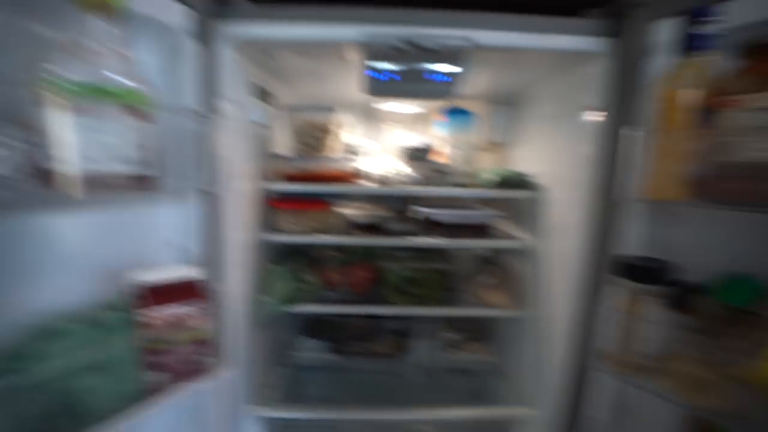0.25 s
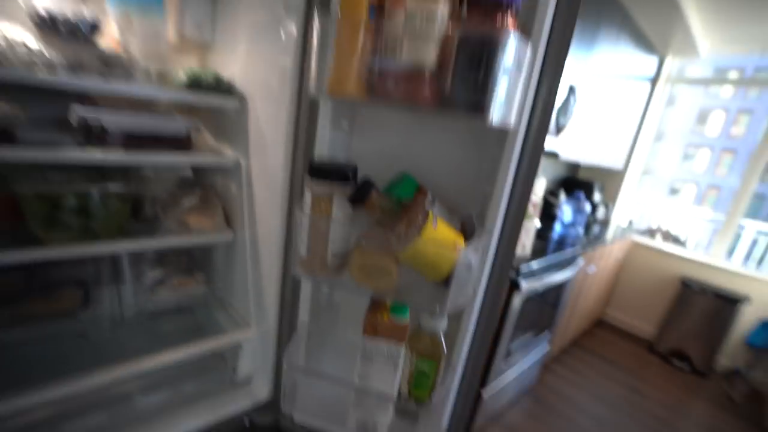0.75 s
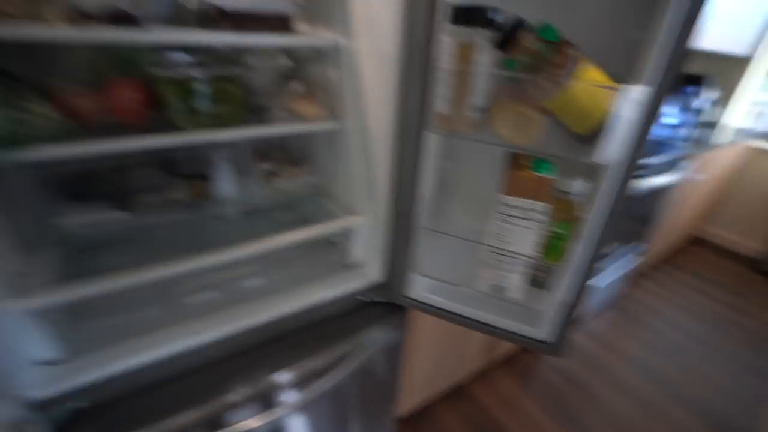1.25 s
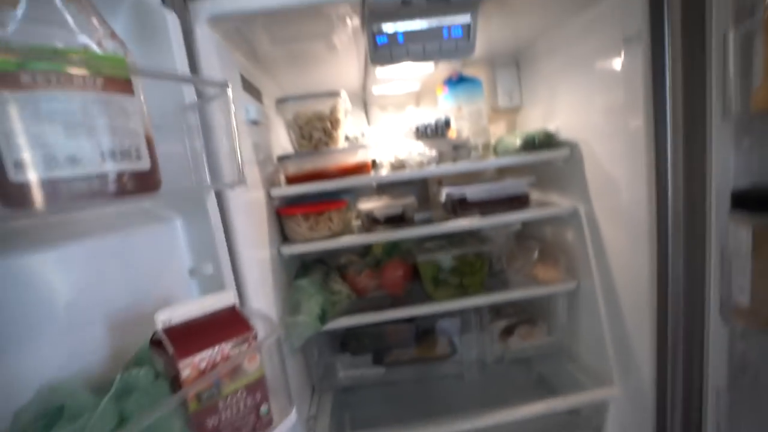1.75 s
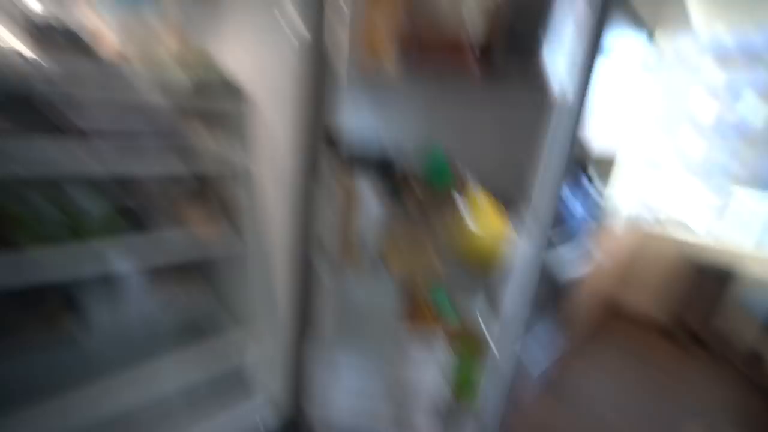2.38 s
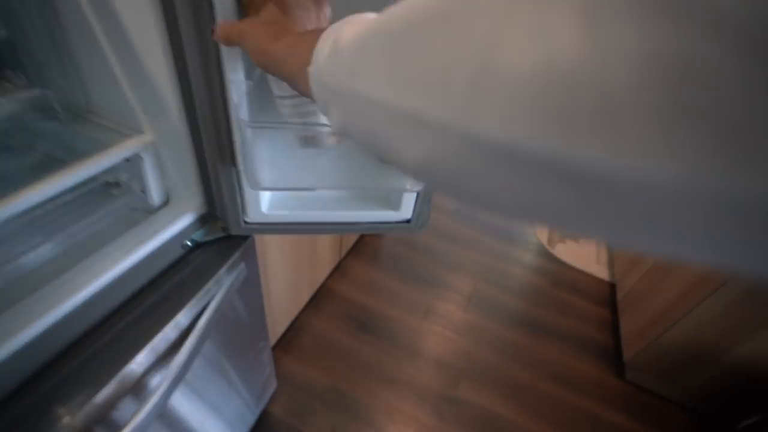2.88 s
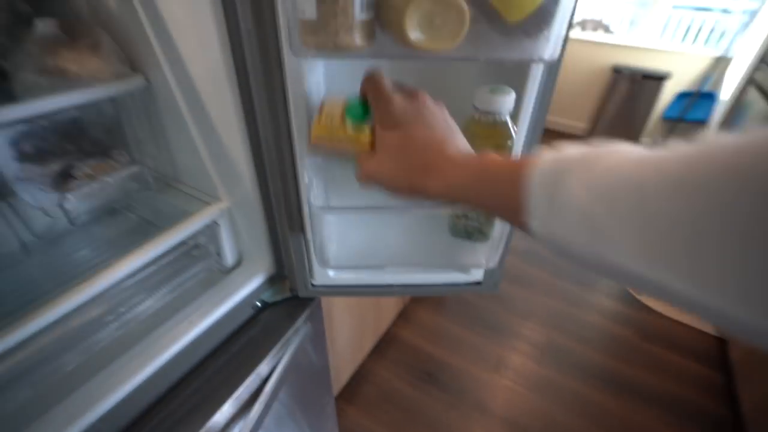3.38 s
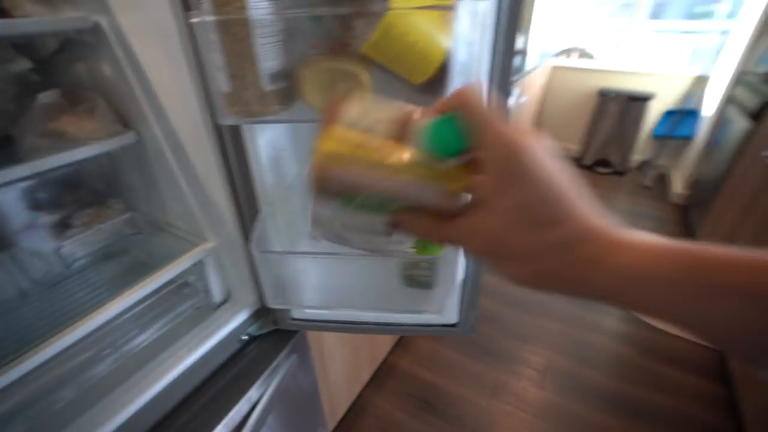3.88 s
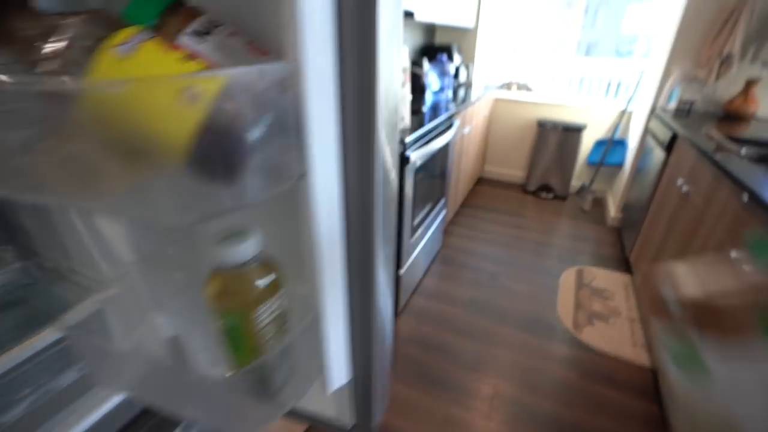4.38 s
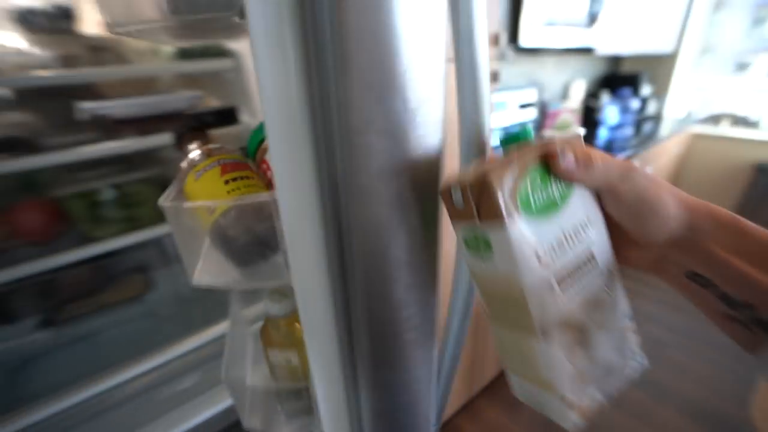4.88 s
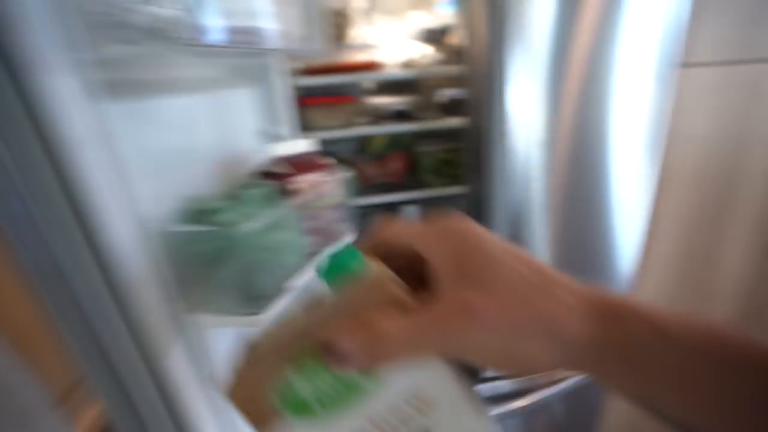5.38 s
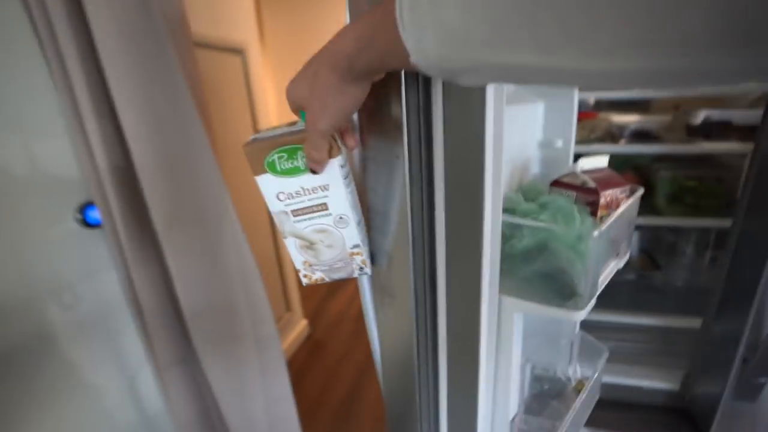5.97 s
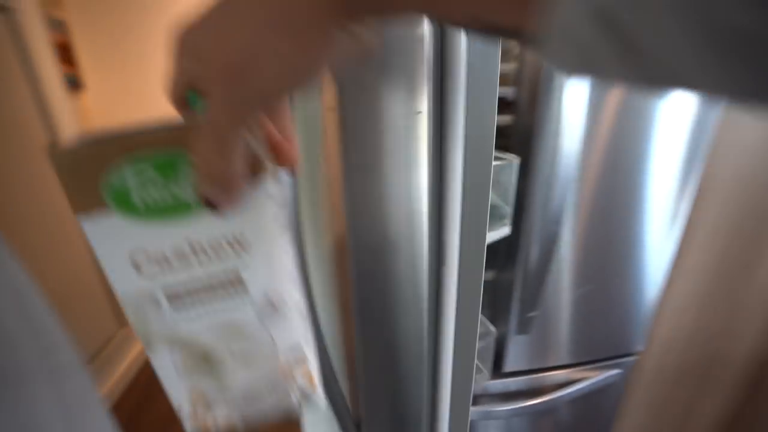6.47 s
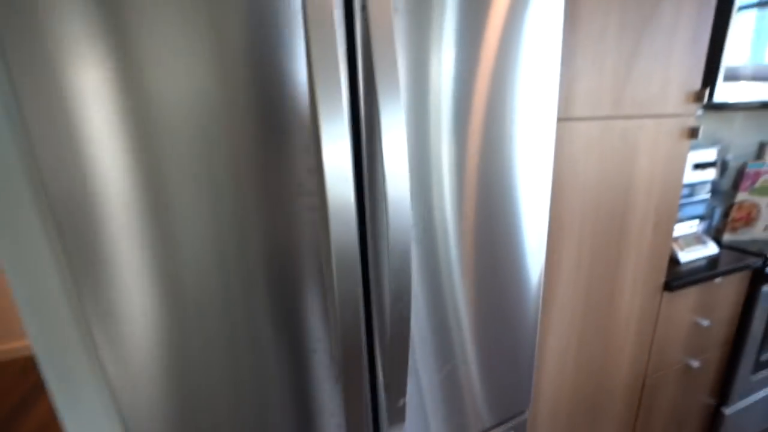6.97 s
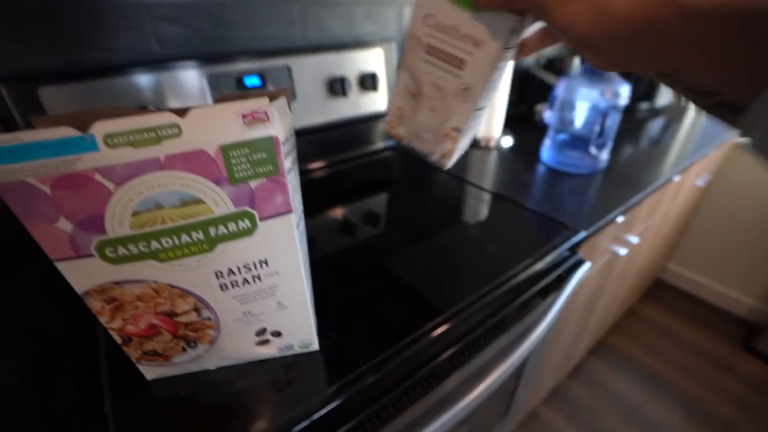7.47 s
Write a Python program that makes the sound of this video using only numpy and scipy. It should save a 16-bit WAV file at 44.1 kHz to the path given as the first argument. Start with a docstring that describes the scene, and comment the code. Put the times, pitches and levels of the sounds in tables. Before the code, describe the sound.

A refrigerator hums quietly in a small kitchen, with faint cloth brushing. A hand reaches in: the door shelf rattles, knocks and snaps, and a carton scrapes free. The first door swings shut with glass jars clinking and a strong dull thump; the second follows with rattling and a final thud. A few light knocks end it. The microphone is very close, and the loudest hits are squashed.

```python
"""A kitchen, at an open refrigerator that hums: wavering motor tones over shaped fan noise and a faint hiss.
A carton is pulled from a door shelf, scraping in dense random contacts, then both doors swing shut.
The hollow plastic door drums through resonances, loose shelves rattle and knock in short noise bursts,
glass jars clink as decaying sine modes and the door seals thump as low swinging tones.
A close microphone with a fast limiter."""
import sys
import numpy as np
from scipy import signal
from scipy.fft import rfft, irfft, next_fast_len
from scipy.io import wavfile
from scipy.ndimage import uniform_filter1d

SR = 44100
rng = np.random.default_rng(int(sys.argv[2]) if len(sys.argv) > 2 else 0)


def boost_factor(decibels):
    """Convert a level in decibels to a linear amplitude factor."""
    exponent = np.asarray(decibels, float) / 20
    return 10 ** exponent


def digitize_waveform(pressure):
    """Quantize a signal to 16-bit integers and store it at the path in sys.argv[1].

    Rows of a 2-D input are taken as channels; values are limited to [-1, 1].
    """
    field = np.atleast_2d(pressure).T
    bounded = np.clip(field, -1, 1)
    quanta = np.round(bounded * 32767).astype(np.int16)
    wavfile.write(sys.argv[1], SR, quanta)


N = 340893


def rms_one(x):
    """Scale to rms 1."""
    return x / np.sqrt(np.mean(x ** 2) + 1e-20)


def in_time(rows):
    """Columns of a curve table, one value a sample."""
    s, *columns = np.transpose(rows)
    # a curve that starts later than 1 s sits 30 dB lower before its first row
    drop_db = 30 * (s[0] > 1)
    return [np.interp(np.arange(N) / SR, s, c, left=c[0] - drop_db) for c in columns]


def coloured(x, spectrum):
    """Give x the spectrum's colour; rms 1."""
    hz, db = np.transpose(spectrum)
    size = next_fast_len(len(x))
    log_hz = np.log(np.arange(size // 2 + 1) * SR / size + 1)
    gain = boost_factor(np.interp(log_hz, np.log(hz), db))
    return rms_one(irfft(rfft(x, size) * gain, size)[:len(x)])


def drift(rate_hz):
    """Slow random wander, rms 1: noise through two equal low-pass poles at rate_hz."""
    step = 40   # samples between computed points
    r = np.exp(-2 * np.pi * step * rate_hz / SR)
    noise = rng.standard_normal(N // step + 2002)
    slow = signal.lfilter([1], [1, -2 * r, r * r], noise)[2000:]   # skip the settling
    return np.interp(np.arange(N) / step, np.arange(len(slow)), rms_one(slow))


def resonance(x, hz, width_hz):
    """Two-pole resonance, gain 1 on top."""
    r = np.exp(-np.pi * width_hz / SR)
    zeros = [(1 - r * r) / 2, 0, (r * r - 1) / 2]
    poles = [1, -2 * r * np.cos(2 * np.pi * hz / SR), r * r]
    return signal.lfilter(zeros, poles, x + 1e-18)


def body(x, modes):
    """Parallel resonances with alternating signs."""
    return sum((-1) ** k * boost_factor(db) * resonance(x, hz, width)
               for k, (hz, width, db) in enumerate(modes))


def grains(per_s, spread_db, clump_db, clump_rate_hz):
    """Random contacts of uneven size that come in clumps."""
    sizes = boost_factor(spread_db * np.minimum(rng.exponential(1, N), 5)) * rng.choice([-1, 1], N)
    hit = rng.random(N) < per_s / SR
    return sizes * hit * boost_factor(clump_db * drift(clump_rate_hz))


def after(column, db, t60):
    """Power envelope that jumps at every tabled knock, by that column's level plus db, and dies away."""
    rows, kicks = np.array(KNOCKS), np.full(N, 1e-18)
    level_db = rows[:, 1] + (column > 1) * rows[:, column]   # later columns are relative to column 1
    kicks[(rows[:, 0] * SR).astype(int)] = boost_factor(level_db + db) ** 2
    return signal.lfilter([1], [1, -boost_factor(-120 / (t60 * SR))], kicks)


# fan and compressor, fainter as the doors close: [start_s, level_db]
HUM = [(0, -27), (.6, -28), (1.5, -26), (2.4, -24.5), (4.6, -30), (5.4, -27.5), (6.5, -35), (7.0, -34),
       (7.73, -36)]
# colour of the fan air: [pitch_hz, relative level_db]
HUM_AIR = [(15, -50), (25, -13.5), (87, -5.5), (153, -12), (175, -12), (195, -4.5), (223, -10), (293, -11),
           (439, -13), (641, -17.5), (988, -24.5), (1160, -26.5), (1480, -30.5), (3720, -51), (16000, -60)]
# motor tones: [pitch_hz, level_db (rms re air), waver_db]
HUM_TONES = [(59, -11, 3), (81, -12, 3), (118, -14, 3), (193.8, -3, 1), (1125, -19, .5), (1185, -30, 2),
             (1292, -29, 3)]


def hum():
    """Fan air is shaped noise; each motor tone is a sine that wavers in level and phase."""
    t = np.arange(N) / SR
    air = coloured(rng.standard_normal(N), HUM_AIR) * boost_factor(0.15 * drift(2.2))
    tones = np.zeros(N)
    for hz, db, waver_db in HUM_TONES:
        level = np.sqrt(2) * boost_factor(db + waver_db * drift(4.0))
        tones += level * np.sin(2 * np.pi * hz * t + .3 * drift(1.5))
    return boost_factor(in_time(HUM)[0]) * (air + tones)


# steady faint hiss of the fridge at first, then sleeve and carton sliding:
# [start_s, scrape level_db, rub level_db (hiss re scrape)]
SLIDING = [(0, -51.5, -14.5), (2.43, -53, -3.5), (2.52, -35.5, -3.5), (2.7, -27, -8.5), (3.0, -30.5, -13),
           (3.1, -34.5, -6), (3.3, -30.5, -17.5), (3.5, -36, -14), (3.64, -38, -10), (3.75, -31, -12),
           (3.79, -27, -14), (4.0, -31, -13), (4.05, -31.5, -27), (4.12, -30.5, -10), (4.2, -42, -11),
           (4.43, -37.5, -13), (4.59, -53.5, -4), (4.76, -46, -9), (4.82, -22.5, -22), (5.0, -25.5, -13),
           (5.17, -38.5, -14), (5.22, -21, -14), (5.35, -34, -15), (5.42, -28, -24), (5.55, -18, -5.5),
           (5.76, -23, -14.5), (5.85, -29.5, -20), (6.0, -36.5, -15), (6.1, -25, -22), (6.32, -28, -16),
           (6.38, -35.5, -14), (6.5, -48, -12), (6.98, -54.5, -26), (7.03, -21, -14), (7.17, -23, -15),
           (7.32, -41, -20), (7.45, -34.5, -5.5), (7.6, -44, -7.5), (7.73, -42, -9)]
# short hissing scuffs of the carton in its bin: [height_s, level_db]
SCUFFS = [(2.762, -33), (2.945, -36), (3.008, -33), (3.06, -39), (3.14, -35), (3.168, -36), (3.315, -37),
          (3.7, -36)]
# colours of shelf rattle, of scraping and of rubbing hiss: [pitch_hz, relative level_db]
RATTLE = [(290, -27), (500, 2), (600, -37), (686, -2), (793, -4), (1420, -7), (1800, -15.5), (2340, -22),
          (3960, -120)]
SCRAPE = [(880, -39), (1500, 1.5), (1800, 4), (2530, 2.5), (2730, 0), (3460, -1), (4320, -7), (5000, -35),
          (6500, -30), (11000, -120)]
RUB = [(2650, -18), (4500, -4), (5210, -5), (7920, -9.5), (9170, -14.5), (14800, -20), (16200, -26),
       (16500, -73)]


def handling():
    """After a faint fridge hiss, shelves rattle; cloth and cardboard scrape and hiss in fine contacts."""
    t = np.arange(N) / SR
    scrape_db, rub_db = in_time(SLIDING)
    scuff_power = sum(boost_factor(2 * db) * np.exp(-((t - s) / .013) ** 2) for s, db in SCUFFS)

    # shelves follow door and sliding by shares
    door_share, waver_db = 0.38, 2.5
    rattle_db = 1.5 + door_share * in_time(DOOR)[0] + (1 - door_share) * scrape_db
    rattle_db = rattle_db + waver_db * drift(12.8)
    busy = np.clip((scrape_db + 50) / 20, 0, 1)   # the faint fridge hiss stays steady
    scrape_db = scrape_db + busy * waver_db * drift(5.6)

    # shaking that follows a knock: level in dB re its part of the knock, t60 in s
    rattle_power = boost_factor(2 * rattle_db) + after(3, db=-11, t60=0.23)
    scrape_power = boost_factor(2 * scrape_db) + after(1, db=-9.5, t60=0.062)
    rub_power = boost_factor(2 * (scrape_db + rub_db)) + after(4, db=-14, t60=0.1) + scuff_power

    rattle = coloured(grains(4000, spread_db=2.4, clump_db=2.0, clump_rate_hz=35), RATTLE)
    slide = grains(12000, spread_db=2.4, clump_db=2.0, clump_rate_hz=45)
    return (np.sqrt(rattle_power) * rattle
            + np.sqrt(scrape_power) * coloured(slide, SCRAPE)
            + np.sqrt(rub_power) * coloured(slide, RUB))


# heavy low blows (heels on the floor, the door panel, seals meeting the cabinet):
# [start_s, level_db (before onset and decay), settled pitch_hz, t60_s]
THUMPS = [(.15, -16.5, 48.4, 0.27), (1.0, -23, 38, 0.49), (4.027, -1.5, 170, .15), (4.345, -7, 40.5, 0.37),
          (5.433, 6, 63.6, 0.24), (5.469, -5.5, 66, 1), (7.116, -4.5, 36, 0.27)]


def thumps():
    """A heavy push on floor or cabinet air swings as a decaying sine, a little higher at first."""
    out = np.zeros(N)
    for s, level_db, hz, t60 in THUMPS:
        t = np.maximum(np.arange(N) / SR - s, 0)
        phase = 2 * np.pi * hz * (t + 0.0028 * (1 - np.exp(-t / 0.028)))   # starts 10 % sharp
        onset = 1 - np.exp(-t / 0.002)
        out -= boost_factor(level_db - 60 * t / t60) * onset * np.sin(phase)
    return out


# sleeve brushing, mostly before the hand reaches in: [height_s, level_db, half_length_s]
SLEEVE = [(.24, -43, 0.069), (0.456, -49, 0.091), (1.1, -58, 0.029), (1.25, -63, .05), (1.58, -56, 0.057),
          (2.0, -49.5, 0.94)]


def sleeve():
    """Soft cloth friction: noise in the scrape colour, in rounded swells."""
    t = np.arange(N) / SR
    level = sum(boost_factor(db) * np.exp(-((t - s) / half) ** 2) for s, db, half in SLEEVE)
    return level * coloured(rng.standard_normal(N), SCRAPE)


# door under the hand: [start_s, liner drumming level_db, low boom and sway level_db (before trims)]
DOOR = [(2.4, -36, -45), (2.58, -37, -46), (2.62, -11.5, -21.5), (3.05, -13.5, -22), (3.15, -15, -19.5),
        (3.45, -11, -19), (3.55, -19, -27), (3.75, -30, -32), (3.86, -12, -44), (4.0, -18.5, -18.5),
        (4.05, -11.5, -22), (4.17, -20, -21), (4.28, -28.5, -40), (4.5, -41, -45), (4.75, -38, -37),
        (4.8, -10, -23), (4.88, -26, -30), (4.92, -26, -26), (5.07, -18, -29), (5.17, -35, -43),
        (5.24, -13.5, -34), (5.41, -28, -32), (5.5, -7, -23), (5.8, -16, -26.5), (5.86, -24, -27),
        (6.05, -14, -18), (6.3, -12, -15.5), (6.5, -27, -33), (6.98, -34, -40), (7.03, -18.5, -16),
        (7.12, -8.5, -17), (7.22, -15, -27), (7.28, -22.5, -36), (7.43, -27.5, -32), (7.46, -50, -39),
        (7.73, -42, -40)]
# hollow door liner, outer panel, door swaying on its hinge: [pitch_hz, width_hz, level_db]
LINER = [(244, 42, -0.5), (307, 28.3, 4.5), (353.7, 42.4, 0.5), (421.6, 47, -1), (556, 56, -9),
         (684, 72, -10.5)]
PANEL = [(160.4, 16, -1.5), (196, 43, -5.5)]
SWAY = [(66, 19.3, 2.5), (88, 39, 2.5), (137, 28.5, 5)]


def door():
    """Small shocks drum the hollow liner and boom the outer panel; low noise sways the door on its hinge."""
    drum_db, low_db = in_time(DOOR)
    sway = rms_one(body(rng.standard_normal(N), SWAY))
    shocks = grains(400, spread_db=1.5, clump_db=0.5, clump_rate_hz=6.7)
    # a second, broad resonance tames both ends
    boom = rms_one(body(body(shocks, PANEL), [(185, 120, 0)]))
    drum = rms_one(body(body(shocks, LINER), [(350, 410, 0)]))
    # the liner goes on drumming after each knock
    drum_power = boost_factor(2 * (drum_db + 2.5 * drift(16.0))) + after(2, db=-10.5, t60=0.21)
    return boost_factor(low_db - 1.5) * sway + boost_factor(low_db - 1) * boom + np.sqrt(drum_power) * drum


def light_knocks():
    """Things shifting on the shelves tick at random, their level following the sliding."""
    per_s, most_per_s = 8.4, 40
    louder_db, spread_db = 4, 7   # re scraping; spread either way
    chance = rng.random((int(N / SR * most_per_s), 3))
    s = chance[:, 0] * (N - 1) / SR
    db = in_time(SLIDING)[0][(s * SR).astype(int)] + louder_db + spread_db * (2 * chance[:, 1] - 1)
    keep = (chance[:, 2] < per_s / most_per_s) & (s > DOOR[0][0])   # none before the door is handled
    return [(a, b, 6.0, -3.0, -22.0) for a, b in zip(s[keep], db[keep])]


# knocks and ticks; levels are before the part trims below:
# [start_s, level_db, liner thud_db, shelf knock_db, bright crack_db (these three re level_db)]
KNOCKS = [(2.548, -8, -8, -16, -10), (2.606, -7.5, 12.5, -7, -17), (2.6818, 4.5, -11, -12, -15),
          (2.7347, -11, 7, 0.5, -11), (2.7717, -2, 11, 5, -24), (2.8274, -22, 19, -6, -6),
          (2.9619, -6.5, 0, -14, -22), (2.9727, -12, 10, -7, -15), (3.022, -6, 2, -8, -24),
          (3.047, -20, 6, 8.5, -11), (3.1265, -15, 17, -11, -22), (3.146, -9, 10, -22, -22),
          (3.1735, -12, 21, 3.5, -22), (3.2321, -5.5, 0, 1.5, -19), (3.263, -13, 13, -4, -20),
          (3.3116, -12, 4, 3.5, -24), (3.4396, -18, 7, -2, -25), (3.468, -20, -9, -7, -30),
          (3.543, -5, -13, -17, -10.5), (3.5891, -11, 8.5, -1, -28), (3.684, -9.5, 6.5, -2.5, -16),
          (3.774, -2, 3.5, -4, -21), (3.8298, -10, 1, -4, -5), (3.9779, -1, 6, -9, -14),
          (4.02, -10, 8, 2, -30), (4.095, -18, 6, 0, -13), (4.1258, -22, -2, 11, -20),
          (4.253, -24, -3, -5, -3), (4.3261, -20.5, 2, -8, -14), (4.48, -39, 1, -3, 8.5),
          (4.6314, -26, -4, -9, -7), (4.6437, -26, 10, 5.5, -4), (4.6793, -14.5, -14, -6.5, -1.5),
          (4.6974, -28.5, -2, 9, -20), (4.788, -3, 4, -1, -21), (4.8227, 0.5, -26, -7, -14),
          (4.863, -11, -8, 5, -18), (4.8865, 2, -33, -22, -8), (4.9142, -6, -26, -5, -28),
          (4.9482, -2, -16, -6.5, -20), (4.9714, -15, -14, 6, -24), (4.9954, -8.5, -12, 3, -28),
          (5.1876, 4.5, -6, -8, -15), (5.3707, -2.5, -21, -3, -29), (5.4274, 6, -10, -11.5, -7),
          (5.4635, -3, 3.5, 0, -2), (5.4954, 5.5, -4, -4.5, -4), (5.5533, -1, -12, -15, -19),
          (5.6167, -5, -6, -11, -23), (5.6844, -12.5, -8, 1, -18), (5.73, -11.5, 8, 0.5, -12),
          (5.7738, -13, -5, 0.5, -22), (5.89, -5.5, -17, -4.5, -23), (5.9648, -18.5, 13, 6.5, -34),
          (6.0141, -6.5, -4, -3, -19), (6.0227, 1.5, -4, -6.5, -22), (6.172, -11, 4, -9, -16),
          (6.266, -5.5, -2, -14, -18), (6.3081, -8, -13, -17, -23), (6.3284, -8.5, 2, -9, -18),
          (6.582, -33, 5, -12, -4), (6.612, -32, -10, -18, -5), (6.7336, -38.5, 9, 16, -30),
          (6.8636, -40, 24, 4, -21), (7.015, 6.5, -12, -20, -27), (7.1023, -4.5, -10, 0, -6),
          (7.1501, -11, 3, 8.5, -22), (7.179, -17.5, 3, 12, -30), (7.6129, -11, -9.5, -5.5, -23),
          (7.6416, -11, -24, -12, -14), (7.6624, -26, -10, -19, -3), (7.725, -21, -4, -4, -25)]
# dry snaps, short and with no shaking after: same columns
SNAPS = [(2.5425, -1, -6, -3, -10), (2.6013, 5.5, -1.5, -24, -18), (2.9177, -8.5, 14, -16, -26),
         (3.3628, 2.5, -0.5, -18, -19), (6.1666, 1.5, 1.5, -20, -20), (7.0052, -5, -24, -2.5, -31),
         (7.4032, -1.5, -26, -1, -5.5)]


def knocks():
    """Each knock is a burst of micro-contacts heard as tick, shelf knock and crack, with a thud in the liner."""
    out, push, t = np.zeros(N + SR), np.zeros(N), np.arange(SR // 8) / SR
    tick, shelf, crack = [signal.butter(3, edges_hz, "band", fs=SR, output="sos")
                          for edges_hz in [(1500, 4500), (480, 1300), (4800, 15000)]]
    hits = [(*row, 0.034) for row in KNOCKS + light_knocks()]   # last number: t60 in s
    hits += [(*row, 0.014) for row in SNAPS]
    for s, level_db, thud_db, shelf_db, crack_db, t60 in hits:
        i = round(s * SR)
        noise = rng.standard_normal(len(t))
        noise[0] = 9.4 * np.sign(noise[0])   # the first contact is the hardest
        # band, trimmed level, stretch of the decay: lows last longer
        parts = [(tick, -4.0, 1), (shelf, shelf_db + 3.5, 1.8), (crack, crack_db + 4.0, .7)]
        for band, db, stretch in parts:
            burst = signal.sosfilt(band, noise * boost_factor(-60 * t / (t60 * stretch)))
            out[i:i + len(t)] += boost_factor(level_db + db) * burst / np.abs(burst).max()
        push[min(i, N - 1)] = boost_factor(level_db + thud_db + 36.5) * np.sign(noise[0])
    return out[:N] + body(push, PANEL + LINER)


# the carton dragged out of its bin, swelling and then free: start_s, height_s, end_s
PULL = (3.775, 3.94, 4.025)


def pull():
    """A dense, even scrape of cardboard on plastic that stops short."""
    start, height, end = PULL
    t = np.arange(N) / SR
    fine = grains(15000, spread_db=0.5, clump_db=2.2, clump_rate_hz=23)
    swell_db = np.interp(t, [start, height, end], [-9.5, 0, -3.5])
    on = uniform_filter1d(1. * ((t > start) & (t < end)), size=200)   # softened edges
    scrape = boost_factor(-15.5 + swell_db) * coloured(fine, SCRAPE)
    hiss = boost_factor(-25 + 1.7 * swell_db) * coloured(fine, RUB)   # hiss swells more
    return on * (scrape + hiss)


# jars touching, and the bottle hit: [start_s, level_db (added to each mode), upper modes_db (added)]
CLINKS = [(4.8233, -21.5, 2.5), (4.888, -2.5, -5), (4.9147, -1, -17), (4.9501, -9.5, -0.5),
          (4.9714, -19, 2), (5.002, -15, -12), (5.1868, -27, 0), (5.462, -5, -14), (5.4954, -18, 2),
          (5.5502, -17.5, -3), (5.7058, -16, -11), (5.7446, -39, -3)]
BOTTLE_HIT = [(5.188, -11.5, 2.5)]
# modes of the glass jars and of the bottle: [pitch_hz, level_db, t60_s]
JARS = [(2078, -16, .3), (2295, -7, .3), (2487, -12, .2), (2550, -9, .35), (2575, -4, .55), (4040, -8, .1),
        (4100, 5, .05), (4150, -6, .4), (4230, -9, .25), (4296, -11, .3), (4392, -12, .25),
        (5457, -20, .15), (6033, -17, .25), (6472, -13, .25), (6746, -18, .3), (8101, -25, .12),
        (9500, -27, .2)]
BOTTLE = [(1210, 6.5, 0.14), (1960, -14, 0.2), (3540, -4, 0.16), (4000, -9, 0.11), (7150, -27, .3)]


def glass(touches, modes):
    """Every touch strikes all modes, the upper ones by its hardness, and stifles the ring of the touch before."""
    out, t = np.zeros(N), np.arange(SR // 2) / SR
    hz, mode_db, t60 = np.transpose(modes)[:, :, None]
    stops = [row[0] for row in touches[1:]] + [N / SR]
    for (s, level_db, upper_db), stop in zip(touches, stops):
        strength_db = level_db + mode_db + upper_db * (hz > 3000)
        strength_db = strength_db + rng.normal(0, 1.5, hz.shape)   # no two touches alike
        ring = (boost_factor(strength_db - 60 * t / t60) * np.sin(2 * np.pi * hz * t)).sum(axis=0)
        stifled = .25 + .75 * np.exp(-np.maximum(t - (stop - s), 0) / .002)
        i = round(s * SR)
        out[i:i + len(t)] += ring * stifled
    return out


def kitchen(x):
    """Room echo: eight feedback delays, duller on every round."""
    t60_s, wall_cut_hz = 0.22, 710   # t60 of the lowest pitches; the walls shorten the rest
    size = next_fast_len(N + SR)
    bins = np.arange(size // 2 + 1)
    z = np.exp(-2j * np.pi * bins / size)   # delay of one sample
    dull = np.exp(-2 * np.pi * wall_cut_hz / SR)
    wall, echo = (1 - dull) / (1 - dull * z), 0
    for k, lag in enumerate((rng.uniform(0.013, .035, 8) * SR).astype(int)):
        delay = np.exp(-2j * np.pi * lag * bins / size)
        loop = boost_factor(-60 * lag / SR / t60_s) * wall * delay
        echo = echo + (-1) ** k * loop / (1 - loop)
    return irfft(rfft(x, size) * echo, size)[:N]


def scene():
    """All sources, with room echo on the knocks and the glass."""
    struck = knocks() + glass(CLINKS, JARS) + glass(BOTTLE_HIT, BOTTLE)
    moved = handling() + thumps() + sleeve() + door() + pull()
    return (hum() + moved + struck + boost_factor(-12) * kitchen(struck))[None]


def roll_off(x):
    """The treble ends steeply here."""
    return signal.sosfilt(signal.butter(12, 17020, fs=SR, output="sos"), x)


def record(dry):
    """Microphone hiss; a limiter ducks within milliseconds and lets go steadily; first peaks slip past and clip."""
    limit_db, release_db_per_s, attack_s = -3, 273, 0.0091
    x = dry + boost_factor(-63.5) * rng.standard_normal(N)
    over_db = np.maximum(20 * np.log10(np.abs(x[0]) + 1e-9) - limit_db, 0)
    # hold the highest overshoot, sinking at the release rate
    ramp = release_db_per_s * np.arange(N) / SR
    held_db = np.maximum.accumulate(over_db + ramp) - ramp
    r = np.exp(-1 / (attack_s * SR))
    duck_db = signal.lfilter([1 - r], [1, -r], held_db)
    treble_end = signal.cheby2(6, 25, 16200, fs=SR, output="sos")   # 25 dB down from 16.2 kHz up
    x = signal.sosfilt(treble_end, x * boost_factor(-duck_db))
    return roll_off(np.clip(x, -1, 1))


dry = scene()
out = record(dry)
digitize_waveform(out)
```